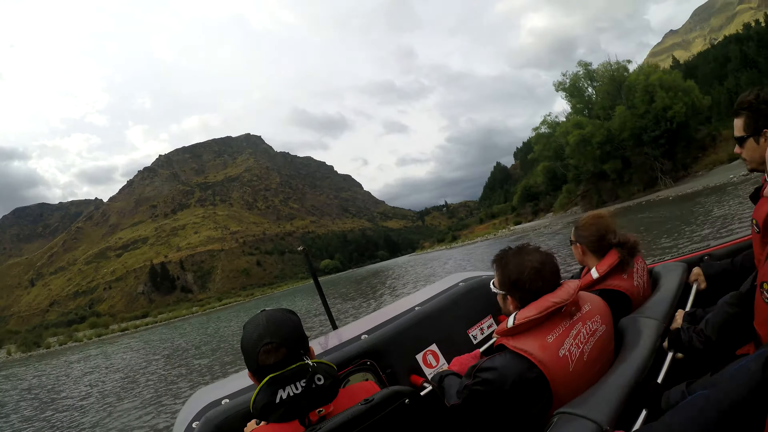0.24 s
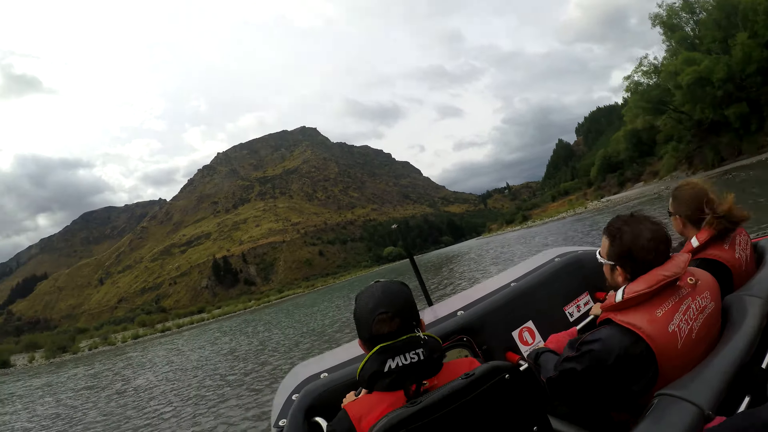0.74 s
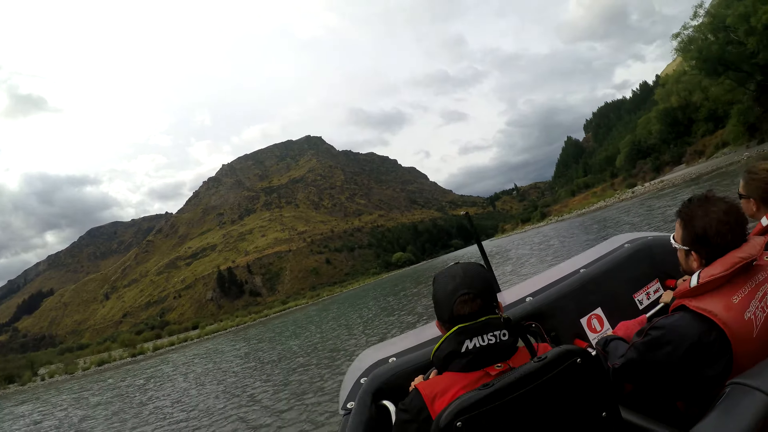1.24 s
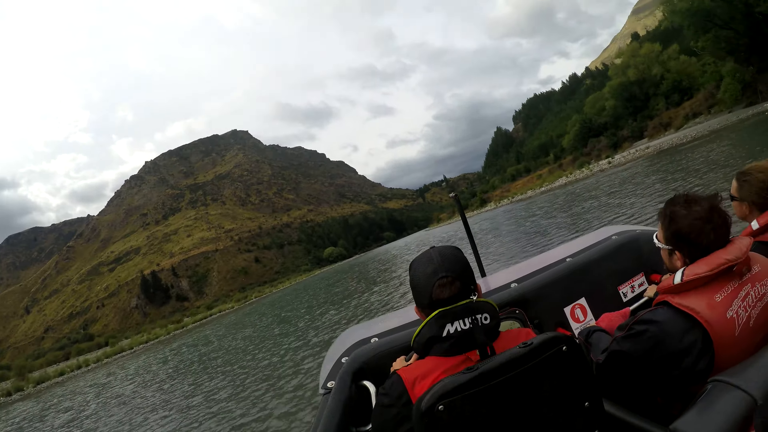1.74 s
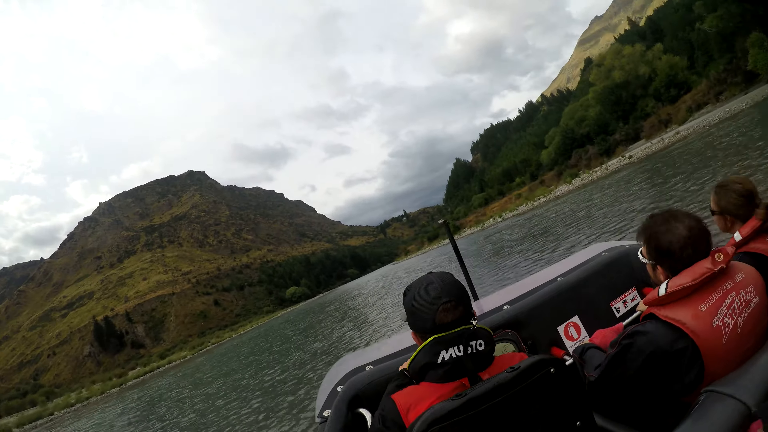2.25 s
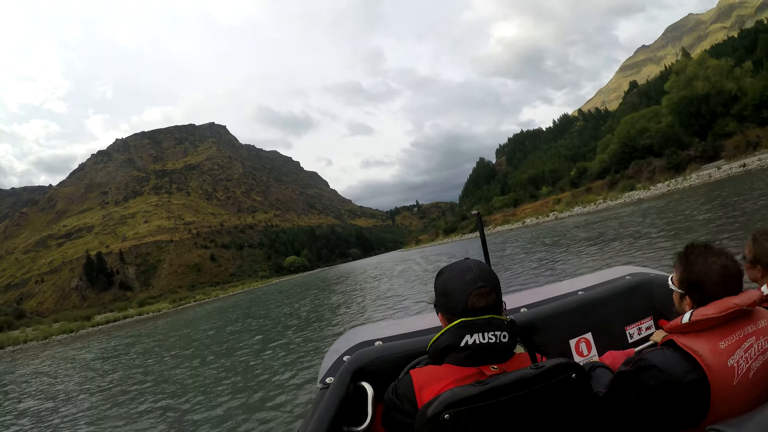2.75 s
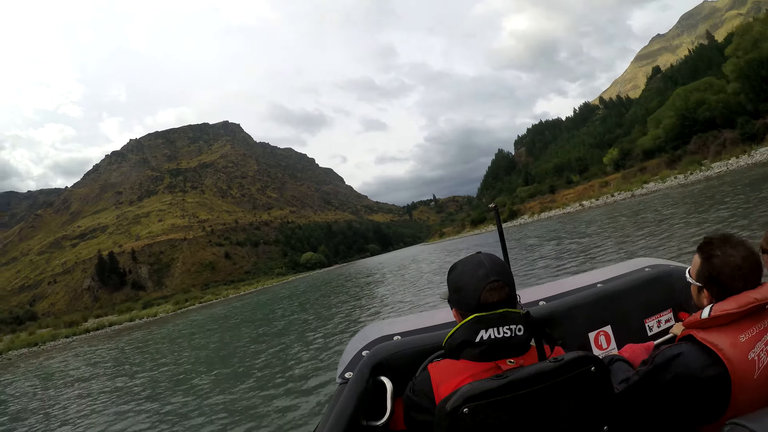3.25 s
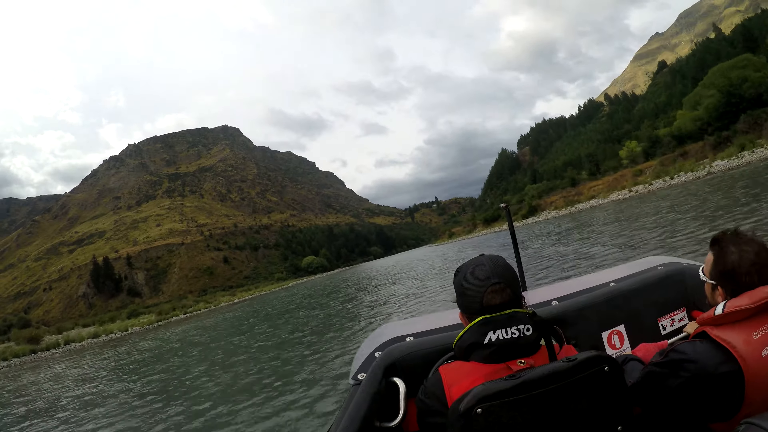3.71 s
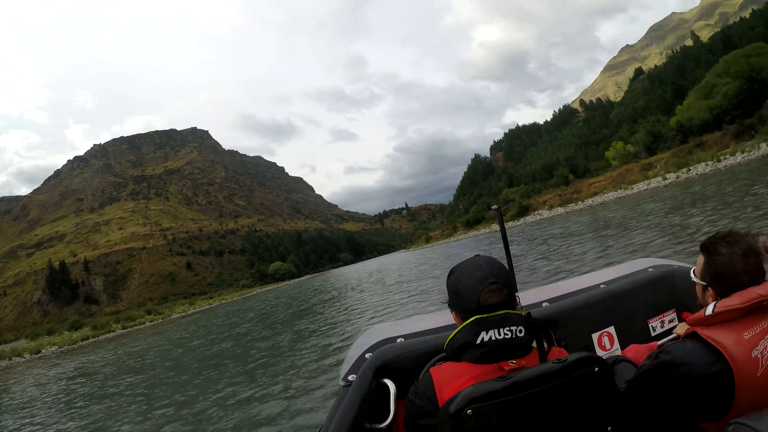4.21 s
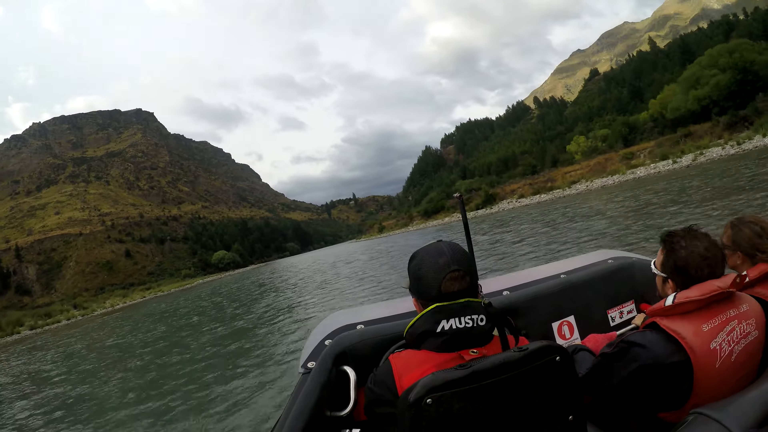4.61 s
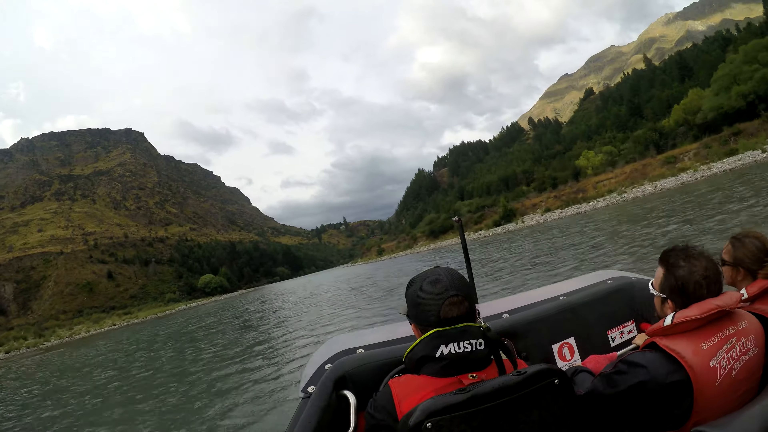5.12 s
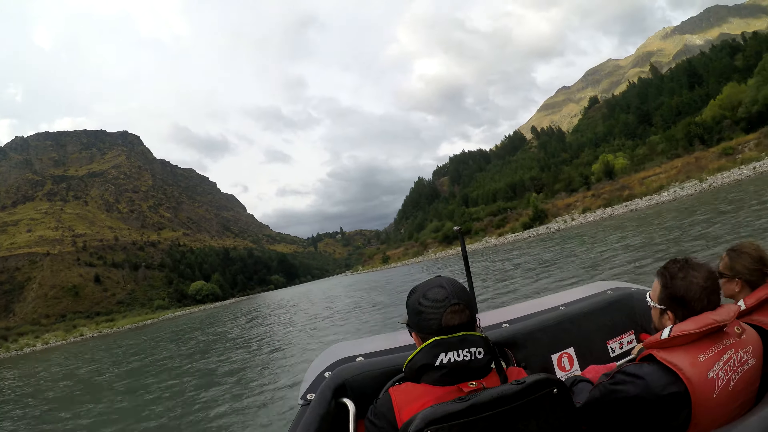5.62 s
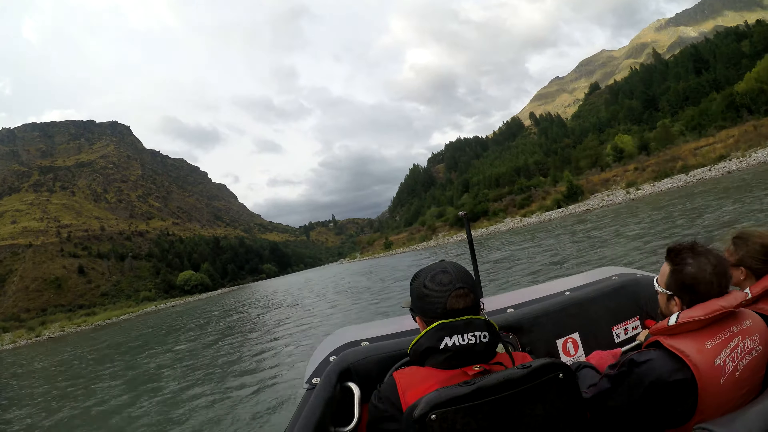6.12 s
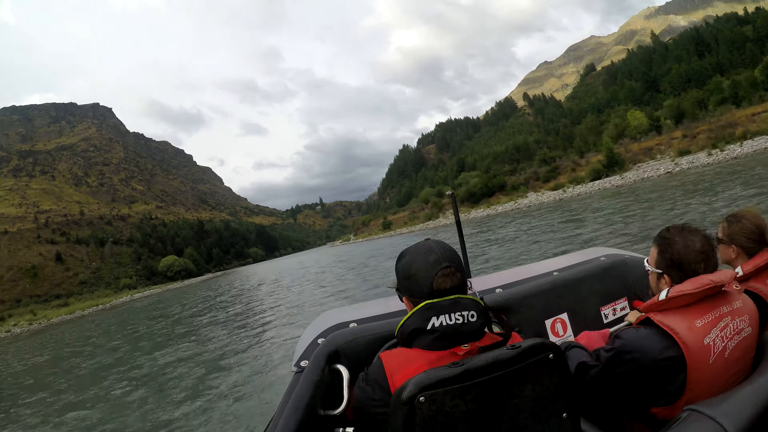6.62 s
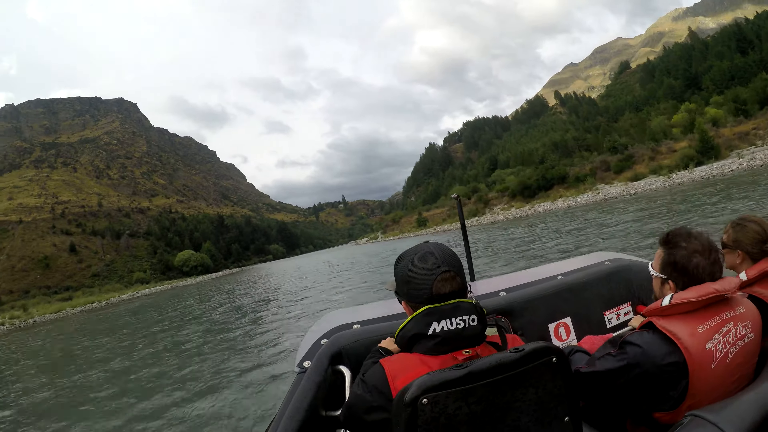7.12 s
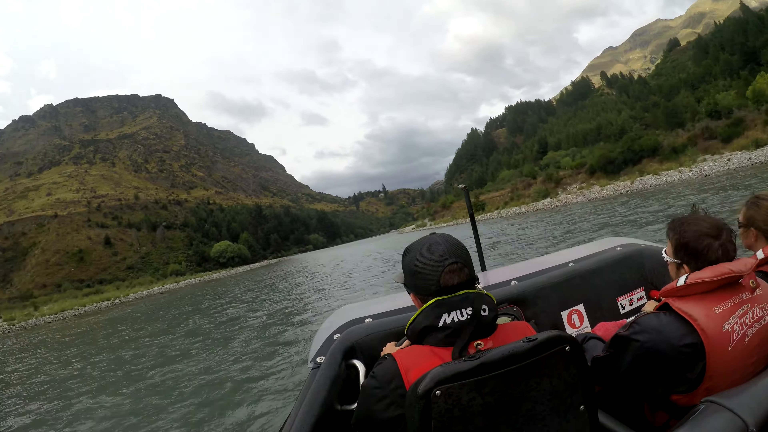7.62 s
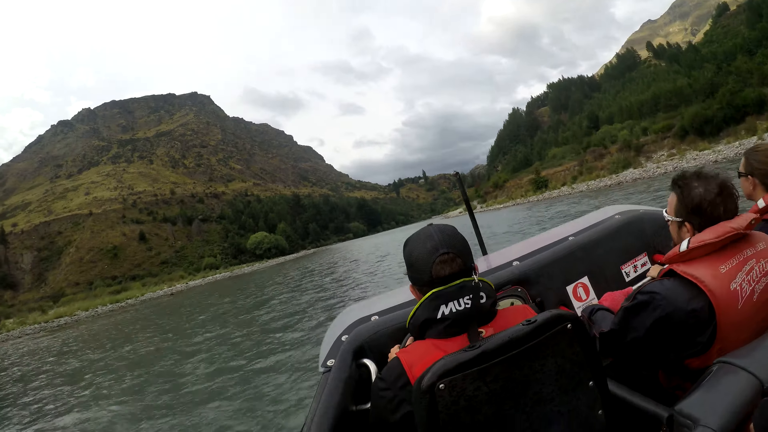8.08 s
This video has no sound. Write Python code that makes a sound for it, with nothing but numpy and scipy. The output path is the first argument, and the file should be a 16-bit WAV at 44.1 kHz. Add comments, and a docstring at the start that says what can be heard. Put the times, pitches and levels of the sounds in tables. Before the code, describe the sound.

A fast boat ride on a river: thumping, fluttering wind roar with brief whistling hoots, an even engine hum and water spray underneath.

```python
"""On a river, aboard a jet boat running flat out, with the microphone in a camera housing in the slipstream.
Closest are the wind sounds: shaped noise buffets and strikes the housing, and rushes and hisses through its port.
The housing's cavity rings as a noise-driven resonance and hoots in short gliding tones; the port sings and chirps.
The air noise drops out when the flow detaches from the port and returns in puffs.
Under the wind an eight-cylinder engine drones as a sum of sines, spray rushes off the hull and drops tick."""
import sys
import numpy as np
from scipy import signal
from scipy.fft import rfft, irfft, next_fast_len
from scipy.io import wavfile
from scipy.ndimage import uniform_filter1d, map_coordinates

SR = 44100
rng = np.random.default_rng(int(sys.argv[2]) if len(sys.argv) > 2 else 0)


def to_wav(sig):
    """Store sig (one row per channel, or 1-D mono) as 16-bit WAV at the path in sys.argv[1].

    Samples outside -1..1 are clipped; the rate is SR.
    """
    pcm = np.clip(np.atleast_2d(sig), -1, 1) * 32767
    pcm = np.round(pcm).astype(np.int16)
    wavfile.write(sys.argv[1], SR, pcm.T)  # frames by channels


N = 368235

# engine speed: (time [s], crankshaft speed [turns per s])
SHAFT = [(0, 67.0), (.8, 67.3), (1.3, 67.55), (1.8, 67.1), (2.4, 66.7), (3, 66.7), (3.7, 66.85),
         (4.3, 66.5), (4.9, 66.25), (5.6, 66.45), (6.2, 66.8), (6.7, 66.7), (7.3, 67.2), (8.35, 67.7)]
# exhaust note: (multiple of the shaft speed, level before shaking [dB rms])
EXHAUST_ORDERS = [(1, -33), (2, -32), (3, -37), (3.5, -39), (4, -40.5), (5, -45), (7, -44.5), (8, -49),
                  (9, -49.5)]

# strength of the airstream at the port: (time [s], level [dB])
AIR = [(0, -30.5), (0.6, -29.5), (0.88, -29), (1.1, -32.5), (1.5, -30.5), (1.8, -30), (2.2, -28.5),
       (2.6, -30), (3.15, -28), (4.1, -29), (4.4, -26), (5.3, -26.5), (6.2, -29), (7.2, -30), (7.7, -29.5),
       (7.99, -35.5), (8.35, -36.5)]
# the flow detaches from the port: (middle [s], half length [s], depth before each layer's share [dB])
LULLS = [(0.079, 0.011, 7), (0.175, 0.024, 14), (0.25, 0.034, 10), (0.322, 0.02, 4), (0.443, 0.035, 6.5),
         (0.544, 0.026, 8), (0.692, 0.024, 6.5), (0.753, 0.023, 13.5), (0.791, 0.0076, 6),
         (1.004, 0.0092, 16), (1.042, 0.026, 8), (1.15, 0.045, 9), (1.254, 0.036, 12), (1.311, 0.015, 8),
         (1.35, 0.028, 10.5), (1.432, 0.015, 8), (1.552, 0.0083, 7), (1.631, .01, 4), (2.74, 0.012, 3),
         (3.261, 0.013, 5), (3.767, 0.014, 7), (3.843, .008, 6), (4.405, 0.01, 6), (5.383, 0.017, 5.5),
         (6.083, 0.0068, 8), (6.502, 0.0089, 7), (6.887, 0.015, 13), (7.185, 0.012, 11), (7.28, 0.027, 11),
         (7.368, 0.025, 11), (7.463, 0.021, 10.5), (7.512, 0.028, 14), (7.744, 0.012, 6),
         (7.785, 0.013, 10), (7.84, 0.019, 8), (7.876, .008, 8), (7.939, 0.026, 9), (8.03, 0.035, 10),
         (8.093, .012, 9), (8.207, 0.04, 6)]
OVERSHOOT = 0.088  # share of a lull's depth by which the returning flow overshoots
RUSH_DB, HISS_DB, CAVITY_DB = -0.7, -6, -1  # gains against the airstream's drive
FULL_AIR_DB, HISS_GROWS, CAVITY_GROWS = -27, 1.12, 0.41  # full flow; dB gained per dB of air around it
STALL_AIR_DB, STALL_FADE = -33, 1.5  # in weaker air, hiss and cavity lose this many extra dB per dB
# narrow resonances of the port: (centre [Hz], width [Hz], relative lift [dB])
PORT = [(1409, 85, 5.5), (1714, 118, 3.5), (2114, 190, 0.5), (3230, 250, 2.5), (4420, 150, 7.5),
        (4814, 170, 8.5), (5384, 150, 7.5), (5780, 270, 2.5), (7220, 360, 6)]
# spectrum of air rushing through the port: (frequency [Hz], relative density [dB per Hz])
RUSH = [(150, -24), (400, 1.5), (750, -0.5), (1030, -4), (1250, -0.5), (1600, -0.5), (2150, 0), (2500, -9),
        (3500, -12), (6000, -51), (15000, -77)]
# spectrum of air hissing through the port: (frequency [Hz], relative density [dB per Hz])
HISS = [(1000, -18), (2000, -4.5), (2800, -2), (4000, -1), (5000, -0.5), (5800, -2.5), (6400, -9),
        (7300, -13.5), (8000, -17), (10000, -24), (11600, -34), (12800, -29), (15000, -40)]
SWIRL_DB, SWIRL_SWING_DB, SWIRLS_PER_S = -12, 4, 28  # level against the airstream; dB per unit of wobble

# slow wind on the housing: (time [s], rumble before RUMBLE_DB [dB], flapping before FLAP_DB [dB])
BUFFET = [(0, -16, -21.5), (0.4, -16, -21), (1.3, -14, -17.5), (1.85, -20.5, -23.5), (2.2, -15, -23),
          (2.65, -22.5, -24.5), (3.0, -16.5, -20.5), (3.5, -17, -21.5), (4.05, -21, -22.5),
          (4.35, -18, -19.5), (4.9, -19.5, -22.5), (5.6, -17, -21.5), (6.2, -20, -22.5),
          (7.0, -15.5, -21.5), (7.7, -15.5, -20.5), (8.0, -20, -24), (8.35, -17, -28)]
RUMBLE_DB, RUMBLE_SWING_DB, RUMBLE_SWINGS_PER_S = 1.26, 2.4, 19  # gain; limit and rate of random swings
FLAP_DB, FLAP_SWING_DB, FLAPS_PER_S = -0.93, 3.5, 32  # the same for the smaller eddies
FLAP_FOLLOWS = 0.47  # share of each rumble throb that the smaller eddies follow
# spectrum of the large eddies: (frequency [Hz], relative density [dB per Hz])
RUMBLE = [(5, -30), (15, -5.5), (25, -9), (36, -1.5), (50, -4), (70, -6), (100, -13), (150, -26),
          (400, -50), (1500, -120)]
# spectrum of the smaller eddies: (frequency [Hz], relative density [dB per Hz])
EDDIES = [(40, -9.5), (80, -10), (120, 3.5), (200, -3), (290, -7.5), (420, -14), (700, -22.5), (1100, -25),
          (2500, -40), (8000, -100)]
# the largest eddies heave against the housing: (peak time [s], level before HEAVE_DB [dB], length scale [s])
HEAVES = [(0.074, -11, 0.037), (0.243, -18, 0.099), (0.348, -13, .05), (.56, -13, 0.11), (.824, -11, 0.025),
          (0.882, -10, 0.03), (1.008, -17, 0.026), (1.464, -13, 0.072), (1.568, -13, .05),
          (1.683, -13, 0.037), (1.78, -13, 0.049), (1.998, -10.5, .05), (2.084, -12, 0.046),
          (2.248, -14.5, 0.15), (2.546, -10, 0.036), (2.625, -10, 0.034), (3.083, -10, .035),
          (3.45, -12, 0.055), (3.568, -12.5, .06), (3.663, -11, .045), (3.837, -17, .11),
          (4.014, -16, 0.036), (4.34, -11, .045), (4.424, -15, 0.054), (4.608, -12, 0.076),
          (4.833, -10.5, 0.059), (4.991, -11, 0.038), (5.24, -11, 0.072), (5.378, -13, .055),
          (5.488, -14, .045), (5.664, -12, 0.097), (5.805, -10, 0.05), (6.055, -11, 0.078),
          (6.182, -16, 0.044), (6.316, -12, 0.12), (6.53, -12.5, 0.12), (6.794, -11, 0.04),
          (6.937, -14, .065), (7.134, -12.5, 0.077), (7.22, -12, 0.042), (7.378, -13, 0.041),
          (7.586, -14, 0.08), (7.698, -16, 0.095), (7.866, -13, 0.037), (8.142, -11.5, 0.13),
          (8.271, -14, 0.037)]
HEAVE_DB, HEAVE_RISE, HEAVE_FALL = 1, 0.49, 0.55  # gain; rise and fall as shares of the length
HEAVE_FLAP_DB = 1  # lift of the smaller eddies at the top of the strongest heave

# strong eddies strike the housing: (peak time [s], relative thump [dB], relative rasp [dB])
BLOWS = [(.122, -19, -30), (0.29, -15, -25), (0.62, -11.5, -16), (0.71, -16, -33), (0.978, -22, -26),
         (1.096, -13, -37), (1.222, -15, -27), (1.454, -15.5, -19.5), (1.557, -13, -26), (1.677, -18, -24),
         (2.096, -21, -18), (2.17, -15, -30), (2.223, -18.5, -17), (2.271, -10.5, -28), (2.393, -14, -41),
         (2.552, -17, -30), (2.744, -15.5, -31), (2.892, -13, -35), (3.03, -14.5, -33), (3.165, -14.5, -42),
         (3.271, -10, -30), (3.375, -10, -18), (3.445, -14.5, -35), (3.537, -9.5, -35), (3.73, -19, -33),
         (3.788, -17, -35), (3.853, -14, -39), (4.109, -11, -25), (4.281, -14, -29), (4.329, -11, -14),
         (4.529, -22, -23), (4.905, -13.5, -25), (5.232, -19, -19), (5.367, -15.5, -25),
         (5.482, -12.5, -22), (5.61, -18, -20), (5.697, -15, -19), (5.956, -12.5, -29), (6.184, -14.5, -27),
         (6.305, -15.5, -17), (6.76, -12, -19), (6.904, -12, -27), (6.98, -17.5, -32), (7.151, -19, -30),
         (7.248, -15.5, -35), (7.45, -16.5, -30), (7.594, -14.5, -28), (7.696, -13, -21), (7.835, -17, -38),
         (8.29, -16.5, -36)]
# spectrum of a blow's low push: (frequency [Hz], relative density [dB per Hz])
THUMP = [(40, -14), (80, 0), (140, 4.5), (210, -0.5), (290, -13), (400, -32), (700, -23.5), (1200, -28.5),
         (4000, -90)]

# a vortex sets the cavity hooting: (peak time [s], level before HOOT_DB [dB], length scale [s])
HOOTS = [(0.135, -25, 0.016), (0.274, -20, 0.035), (.452, -20.5, 0.024), (0.899, -21, 0.015),
         (1.063, -24.5, 0.012), (1.11, -16, 0.012), (1.194, -24.5, 0.0255), (1.457, -15.5, 0.016),
         (1.58, -18, 0.032), (1.672, -17.5, 0.008), (2.103, -21, 0.012), (2.821, -23, 0.017),
         (3.091, -16, 0.011), (3.272, -20, .01), (3.434, -12.5, 0.012), (3.474, -22, .011),
         (3.649, -19.5, 0.015), (3.733, -24, 0.016), (3.868, -15, 0.014), (3.917, -17.5, 0.022),
         (4.055, -23, 0.011), (4.143, -20, 0.0093), (4.287, -12, 0.0066), (4.339, -20, 0.0089),
         (4.417, -17.5, 0.014), (4.565, -18.5, 0.012), (4.62, -20.5, .014), (4.86, -23, 0.025),
         (4.91, -16.5, 0.014), (4.978, -18, 0.027), (5.118, -23, 0.017), (5.172, -18, 0.013),
         (5.21, -16.5, 0.008), (5.237, -19, 0.0081), (5.278, -16, 0.01), (5.366, -18, 0.012),
         (5.401, -18.5, 0.0093), (5.48, -17.5, 0.0079), (5.715, -22, .012), (5.776, -15.5, 0.014),
         (5.801, -20, 0.0063), (5.843, -13.5, 0.0095), (5.92, -16, 0.008), (5.956, -20, 0.0098),
         (6.044, -18.5, 0.01), (6.093, -22, .012), (6.164, -18.5, 0.018), (6.268, -18, 0.012),
         (6.316, -19.5, 0.016), (6.348, -16.5, 0.011), (6.437, -23, 0.016), (6.521, -17.5, 0.021),
         (6.76, -18.9, 0.0094), (6.811, -15, 0.0098), (6.94, -27, .014), (6.985, -24, .012),
         (7.052, -18, 0.031), (7.418, -18.5, 0.013), (7.482, -20.5, 0.013), (7.698, -19, 0.0077),
         (7.762, -16.5, 0.0081), (7.809, -25.5, 0.025), (7.86, -23.2, 0.016), (7.911, -20, 0.011)]
HOOT_DB, HOOT_RISE, HOOT_FALL = 3.5, 0.6, 0.77  # gain; rise and fall as shares of the length
HOOT_FLAT_HZ, HOOT_SHARP_HZ = 45.4, 12.3  # a hoot glides from this far below its pitch to this far above
HOOT_GLIDE_HZ_PER_S, HOOT_SCATTER_HZ = 1490, 9.3  # glide rate; random spread of pitch between hoots
RING_SWING_DB, RING_SWINGS_PER_S = 2.5, 50  # limit and rate of swings in the cavity's ring

# puffs as the flow touches the port again: (peak time [s], relative rush [dB], relative hiss [dB], decay [s])
PUFFS = [(.196, -32, -33, 0.013), (.262, -32, -41, 0.01), (.572, -32, -40, 0.014), (0.857, -17, -26, 0.03),
         (.971, -30, -28, .008), (1.01, -27, -34, 0.0065), (1.06, -30, -32, 0.017),
         (1.209, -18.5, -23.5, 0.011), (1.382, -34, -34, 0.012), (6.9, -29, -34, 0.012),
         (7.299, -22, -35, 0.012), (7.7, -25, -22, .011), (7.766, -19, -27, 0.015),
         (7.866, -26, -25, 0.0064), (7.968, -26, -35, 0.0091), (8.075, -24, -35, 0.0082),
         (8.116, -34, -38, .006), (8.138, -18, -29, 0.0074), (8.272, -24, -38, 0.034)]
SURGE_RISE_S, SURGE_FALL_S = 0.014, 0.0085  # pressure swell that comes with every hoot, blow and puff
SURGE_RUMBLE_DB, SURGE_FLAP_DB, SURGE_RUSH_DB = 1.5, 2.5, 0.75  # dB per unit of surge in each layer

# air sings on the edge of the port: (start [s], length [s], level before flutter and lulls [dB])
EDGE_NOTES = [(0, 0.19, -40), (.35, .045, -43), (0.486, .04, -42), (.58, .09, -47), (0.825, .16, -40),
              (7.55, 0.18, -42), (7.76, 0.12, -41)]
EDGE_FADE_S = 0.015
# an eddy makes one of the port's modes sing out: (peak time [s], pitch at the peak [Hz], peak level [dB])
CHIRPS = [(.856, 1460, -21), (3.378, 1730, -24), (5.125, 2100, -25), (5.36, 1410, -28), (5.618, 1410, -26),
          (7.542, 1410, -26), (7.62, 1420, -26.5)]

# spectrum of spray off the hull: (frequency [Hz], relative density [dB per Hz])
SPRAY = [(100, -18), (450, 10.5), (700, -4.5), (1200, -11), (1800, 4), (2600, -12), (4500, -12),
         (6000, -15), (8000, -23.5), (11000, -25.5), (15000, -41)]
# drops of spray tick on the housing: (peak time [s], level [dB])
DROPS = [(1.008, -36), (1.322, -31), (1.452, -37), (1.573, -32), (1.996, -32), (3.847, -37), (6.155, -33),
         (6.513, -34), (6.801, -33), (6.897, -35), (7.69, -33)]
# spectrum of a drop's tick: (frequency [Hz], relative density [dB per Hz])
TICK = [(1000, -11), (4500, 7), (7500, -1), (10000, -10), (15000, -19)]
TOP_HZ = 15050  # upper band limit at the microphone


def amp(db):
    """Decibels to gain."""
    return 10 ** (np.asarray(db) / 20)


def unit(x):
    """Scaled to rms 1."""
    return x / np.sqrt(np.mean(x ** 2) + 1e-20)


def clock():
    """The time of each sample in seconds."""
    return np.arange(N) / SR


def curves(rows):
    """One value per sample for each column after the time."""
    times, *columns = np.transpose(rows)
    return [np.interp(clock(), times, column) for column in columns]


def wobble(rate):
    """A smooth random curve through normal draws, rate knots a second."""
    knots = rng.standard_normal(int(N * rate / SR) + 4)
    return map_coordinates(knots, [clock() * rate], mode="mirror")


def sine(pitch_hz):
    """A sine whose phase sums a moving pitch."""
    return np.sin(2 * np.pi * np.cumsum(pitch_hz) / SR)


def filtered(x, response):
    """x times a response of frequency, padded against wrap-around."""
    size = next_fast_len(N + SR // 2)
    hz = np.fft.rfftfreq(size, 1 / SR)
    return irfft(rfft(x, size) * response(hz), size)[..., :N]


def noise(spectrum):
    """Noise of rms 1 whose spectrum joins the given points over log frequency."""
    points_hz, points_db = np.transpose(spectrum)

    def response(hz):
        return amp(np.interp(np.log(hz + 1), np.log(points_hz), points_db))
    return unit(filtered(rng.standard_normal(N), response))


def resonance(hz, centre_hz, width_hz):
    """Causal response of one mode, 1 at its centre."""
    damping = 1j * hz * width_hz
    return damping / (centre_hz ** 2 - hz ** 2 + damping)


def through_port(x):
    """The port's modes lift narrow bands of the air noise, which is then set to rms 1."""
    def response(hz):
        return amp(sum(db * abs(resonance(hz, centre, width)) ** 2 for centre, width, db in PORT))
    return unit(filtered(x, response))


def evened(x, span):
    """x with its own chance swells, slower than span seconds, flattened."""
    size = max(int(span * SR), 1)
    power = uniform_filter1d(uniform_filter1d(x ** 2, size), size)
    return x / np.sqrt(abs(power) + 1e-6)


def swells(times, sizes, rise, fall):
    """A sum of short swells: Gaussian rise to each given time, exponential fall after it."""
    out = np.zeros(N)
    for peak_s, size in zip(times, sizes):
        first = max(int((peak_s - 4 * rise) * SR), 0)
        last = min(int((peak_s + 8 * fall) * SR), N)
        near = np.arange(first, last)
        u = near / SR - peak_s
        out[near] += size * np.where(u < 0, np.exp(-(u / rise) ** 2), np.exp(-abs(u) / fall))
    return out


def gusts(rate=70, linger=0.0089):
    """Eddies arrive at random, rate a second: each pushes at once and fades over linger seconds."""
    kicks = (rng.random(N) < rate / SR) * (1 + rng.random(N))
    push = signal.lfilter([1], [1, -np.exp(-1 / (linger * SR))], kicks)
    push = np.sqrt(abs(uniform_filter1d(push, size=90)) + 0.085)
    return unit(push - push.mean())


def detachment():
    """Depth in dB as the flow peels off the port, before each layer's share; it returns with an overshoot."""
    out, t = np.zeros(N), clock()
    corners = np.array([-1.08, -0.037, 0.27, 0.96, 0.99])
    for middle_s, half_length, depth_db in LULLS:
        out += depth_db * np.interp(t, middle_s + half_length * corners, [0, 1, 1, -OVERSHOOT, 0])
    return out


def surges():
    """The pressure swells that the strong vortices bring along, with slacker air between them."""
    times = [row[0] for table in (HOOTS, BLOWS, PUFFS) for row in table]
    surge = np.minimum(swells(times, np.ones(len(times)), SURGE_RISE_S, SURGE_FALL_S), 1)
    return surge - uniform_filter1d(surge, size=SR // 2)


def driven_db(grows):
    """Level of a sound that grows with the airstream and fades fast once the flow stalls."""
    air_db, = curves(AIR)
    stall_db = STALL_FADE * np.maximum(STALL_AIR_DB - air_db, 0)
    return FULL_AIR_DB + grows * (air_db - FULL_AIR_DB) - stall_db


def engine(rough=0.29):
    """Exhaust orders follow the shaft, each shaken by the moving air."""
    shaft_hz, = curves(SHAFT)
    angle = 2 * np.pi * np.cumsum(shaft_hz + 0.2024 * wobble(12)) / SR
    out = np.zeros(N)
    for multiple, db in EXHAUST_ORDERS:
        order = np.round(2 * multiple) / 2  # a four-stroke cycle takes two turns
        level = amp(db) * np.sqrt(2) * (1 + rough * wobble(15))
        out += level * np.sin(order * angle + rng.uniform(0, 2 * np.pi))
    return out


def spray(level_db=-41, grows=0.15):
    """Water sheets off the hull with a fine grain, louder as the air rushes harder."""
    air_db, = curves(AIR)
    grain_db = 0.45 * wobble(6.7) + 0.82 * wobble(270)
    return amp(level_db + grows * (air_db - air_db.mean()) + grain_db) * noise(SPRAY)


def slipstream(gust, lull_db):
    """Air rushes and hisses through the port, fluttering most where the flow keeps detaching."""
    air_db, = curves(AIR)
    unsteady = np.clip(uniform_filter1d(lull_db, SR // 2) / 2.6, 0, 1)
    flutter = (0.79 + 1.16 * unsteady) * wobble(85) + wobble(500)
    rush_db = air_db + RUSH_DB + 1.47 * gust + 0.37 * flutter - 0.59 * lull_db
    rush = amp(rush_db) * through_port(noise(RUSH))
    fine_eddies = 0.62 * wobble(140)  # too small to move the lower rush
    hiss_db = driven_db(HISS_GROWS) + HISS_DB + 0.59 * gust + flutter + fine_eddies - 1.26 * lull_db
    return rush + amp(hiss_db) * through_port(noise(HISS))


def swirls(lull_db, count=3):
    """Passing eddies make the port's lowest modes flare into brief wavering tones."""
    air_db, = curves(AIR)
    out = np.zeros(N)
    for centre_hz, width_hz, db in PORT[:count]:
        pitch_hz = centre_hz + width_hz * (0.3 * wobble(30) + 0.3995 * wobble(300))
        flare_db = SWIRL_SWING_DB * np.minimum(wobble(SWIRLS_PER_S), 2)
        out += amp(0.5 * db + flare_db) * sine(pitch_hz)
    return amp(air_db + SWIRL_DB - lull_db) * unit(out)


def edge_tone(lull_db, centre_hz=4830, width_hz=120):
    """At set times the air sings a breathy high note, narrow-band noise, on the rim of the port."""
    level, t = np.zeros(N), clock()
    for start, length, db in EDGE_NOTES:
        end = start + length
        corners = [start - EDGE_FADE_S, start, end, end + EDGE_FADE_S]
        level += amp(db) * np.interp(t, corners, [0, 1, 1, 0])

    def response(hz):
        return resonance(hz, centre_hz, width_hz) * resonance(hz, centre_hz, 900)
    note = unit(filtered(rng.standard_normal(N), response))
    return level * amp(1.2 * wobble(60) - 3.3 * lull_db) * note


def buffeting(gust, lull_db, surge):
    """Large eddies heave out of a low rumble; smaller ones ride on them and flap against the housing."""
    buffet_db, eddy_db = curves(BUFFET)
    throb_db = RUMBLE_SWING_DB * np.tanh(wobble(RUMBLE_SWINGS_PER_S))
    heave = np.zeros(N)
    for peak_s, db, length in HEAVES:
        heave += swells([peak_s], [amp(db + HEAVE_DB)], HEAVE_RISE * length, HEAVE_FALL * length)
    bed = amp(buffet_db + RUMBLE_DB + throb_db + SURGE_RUMBLE_DB * surge)
    rumble = np.hypot(bed, heave) * evened(noise(RUMBLE), span=0.041)

    flap_db = FLAP_FOLLOWS * throb_db + FLAP_SWING_DB * np.tanh(wobble(FLAPS_PER_S))
    flap_db += SURGE_FLAP_DB * surge + HEAVE_FLAP_DB * heave / heave.max()
    bursts = unit(amp(flap_db + 1.43 * gust - 0.37 * lull_db))
    return rumble + amp(eddy_db + FLAP_DB) * bursts * evened(noise(EDDIES), span=0.01)


def cavity(gust, lull_db, centre_hz=926, width_hz=34, waver_hz=12):
    """Turbulence keeps the housing's cavity ringing; single vortices make it hoot over a softened ring."""
    def response(hz):
        return resonance(hz, centre_hz, width_hz) * resonance(hz, 834, 155)
    drive = amp(3.2 * gust) * rng.standard_normal(N)
    ring = evened(unit(filtered(drive, response)), span=0.038)
    swing_db = RING_SWING_DB * np.tanh(wobble(RING_SWINGS_PER_S))
    ring *= amp(driven_db(CAVITY_GROWS) + CAVITY_DB + swing_db + 0.5 * gust - 0.45 * lull_db)
    fronts = [peak_s - length / 2 for peak_s, _, length in HOOTS]
    arriving = np.clip(swells(fronts, np.ones(len(fronts)), rise=0.012, fall=0.0091), 0, 1)
    return (1 - 0.2 * arriving) * ring + hoots(centre_hz, waver_hz)


def blows():
    """A strong eddy gives one low push and a rasp of torn air."""
    times, thump_db, rasp_db = np.transpose(BLOWS)
    push = swells(times, amp(thump_db + 1.36), rise=0.007, fall=0.0078)
    thump = push * evened(noise(THUMP), span=0.017)
    torn_air = through_port(noise(RUSH) + amp(-12) * noise(HISS))
    return thump + swells(times, amp(rasp_db - 6.5), rise=0.0037, fall=0.011) * torn_air


def hoots(centre_hz, waver_hz):
    """Each vortex blows one short note that glides up through the cavity's pitch."""
    out, t, waver = np.zeros(N), clock(), waver_hz * wobble(110)
    for (peak_s, db, length), chance in zip(HOOTS, rng.standard_normal(len(HOOTS))):
        level = swells([peak_s], [amp(db + HOOT_DB)], HOOT_RISE * length, HOOT_FALL * length)
        near = np.flatnonzero(level)
        glide_hz = np.clip(HOOT_GLIDE_HZ_PER_S * (t[near] - peak_s), -HOOT_FLAT_HZ, HOOT_SHARP_HZ)
        pitch_hz = centre_hz + HOOT_SCATTER_HZ * chance + glide_hz + waver[near]
        out[near] += level[near] * sine(pitch_hz)
    return out


def puffs(shove_db=4):
    """Short bursts of air, sharp at the front, each with a low shove on the housing."""
    rush = through_port(noise(RUSH)) + amp(shove_db) * evened(noise(EDDIES), span=0.013)
    hiss = through_port(noise(HISS))
    low, high = np.zeros(N), np.zeros(N)
    for peak_s, rush_db, hiss_db, decay in PUFFS:
        low += swells([peak_s], [amp(rush_db - 6.5)], rise=0.0045, fall=decay)
        high += swells([peak_s], [amp(hiss_db - 7)], rise=0.0034, fall=decay)
    return low * rush + high * hiss


def chirps(rise_s=0.01, fall_s=0.014, sag_hz_per_s=2000, waver_hz=25):
    """Single eddies make the port sing out: short wavering tones that sag in pitch."""
    out, t, waver = np.zeros(N), clock(), waver_hz * wobble(250)
    for peak_s, hz, db in CHIRPS:
        level = swells([peak_s], [amp(db)], rise_s, fall_s)
        near = np.flatnonzero(level)
        pitch_hz = hz - sag_hz_per_s * (t[near] - peak_s) + waver[near]
        out[near] += level[near] * sine(pitch_hz)
    return out


def drops(fall_s=0.0015):
    """Single drops of spray hit the housing with a tiny tick of noise."""
    times, db = np.transpose(DROPS)
    return swells(times, amp(db), rise=0.0004, fall=fall_s) * noise(TICK)


def scene():
    """One turbulent flow drives the wind sounds, over the engine and the water."""
    gust = unit(gusts() + 0.5 * wobble(45))
    lull_db, surge = detachment(), surges()
    low_wind = buffeting(gust, lull_db, surge) + cavity(gust, lull_db) + blows()
    high_wind = amp(SURGE_RUSH_DB * surge) * slipstream(gust, lull_db)
    high_wind += swirls(lull_db) + edge_tone(lull_db) + puffs() + chirps()
    return (engine() + spray() + low_wind + high_wind + drops())[None]


def record(dry, ceiling=0.88):
    """The camera rounds off the highest peaks and keeps nothing above its band limit."""
    rounded = dry / (1 + (dry / ceiling) ** 8) ** (1 / 8)
    return filtered(rounded, lambda hz: hz < TOP_HZ)


dry = scene()
out = record(dry)
to_wav(out)
```